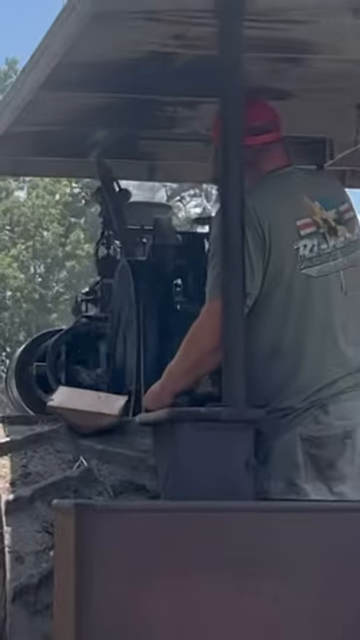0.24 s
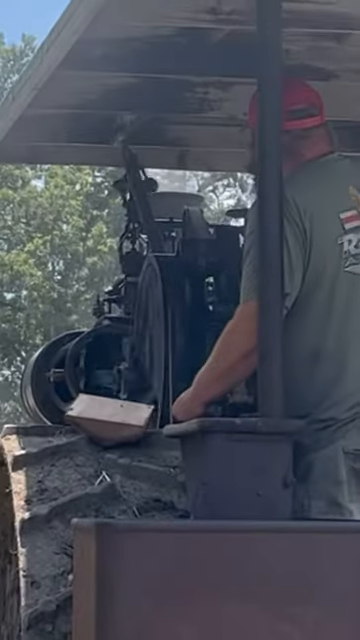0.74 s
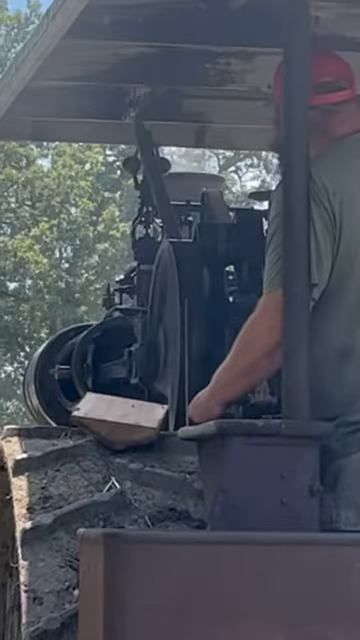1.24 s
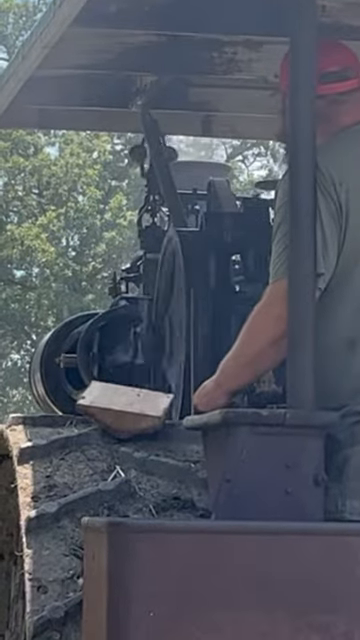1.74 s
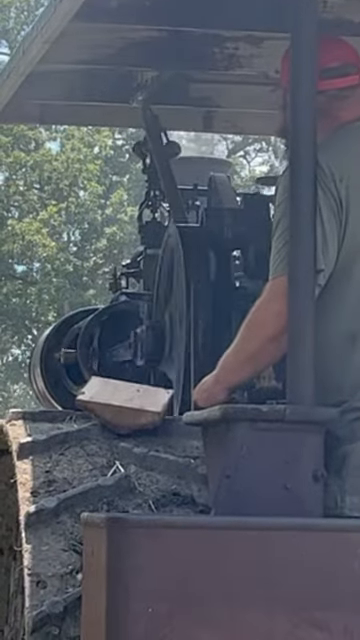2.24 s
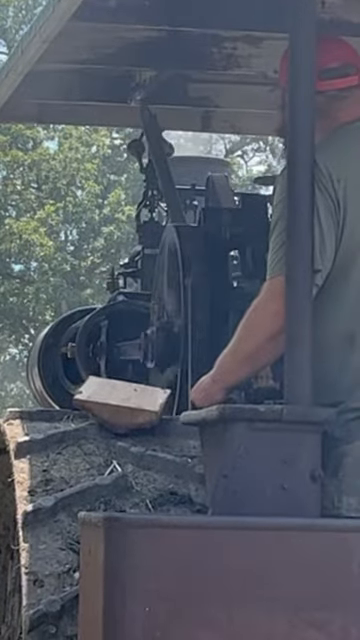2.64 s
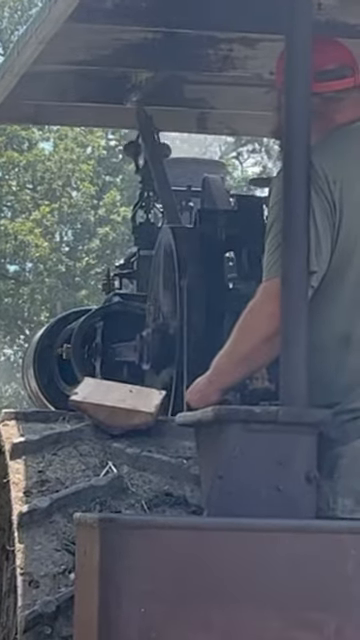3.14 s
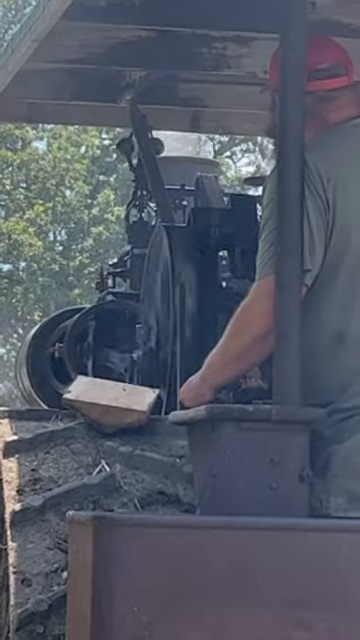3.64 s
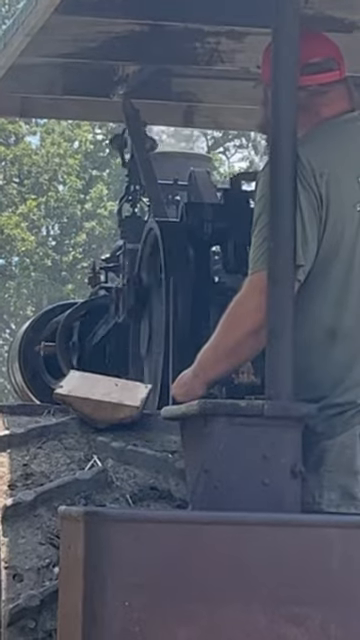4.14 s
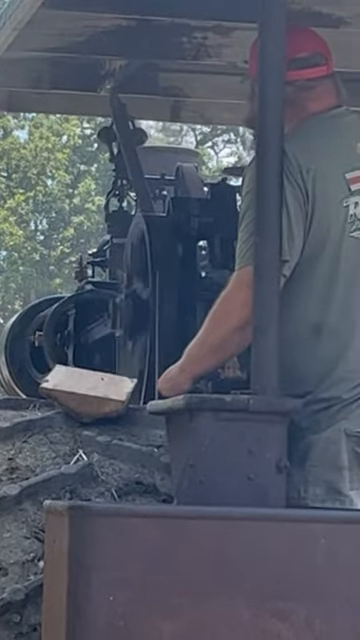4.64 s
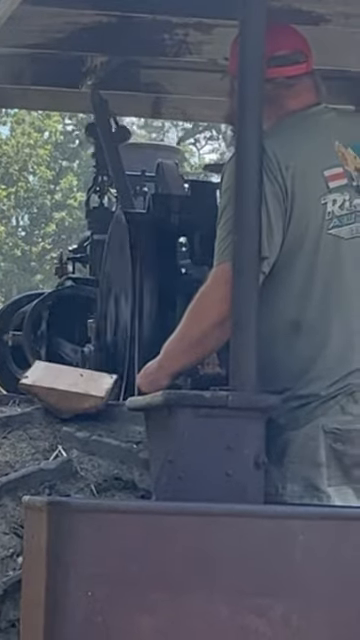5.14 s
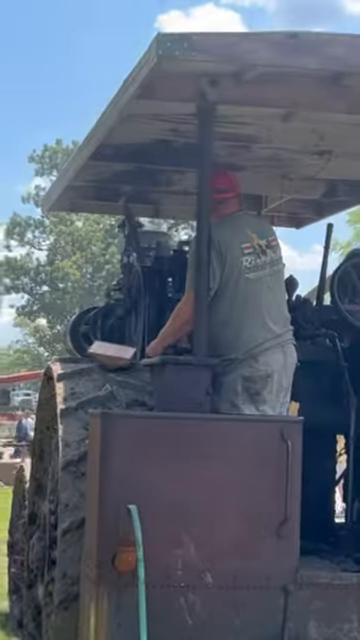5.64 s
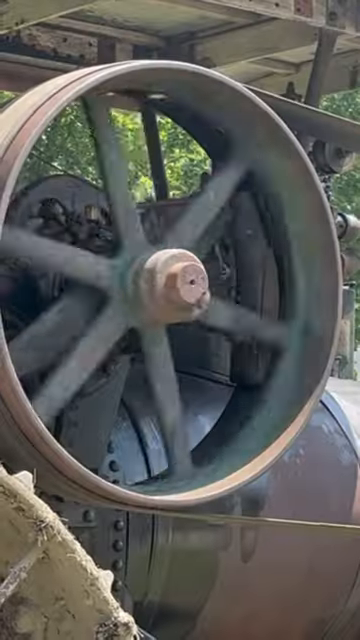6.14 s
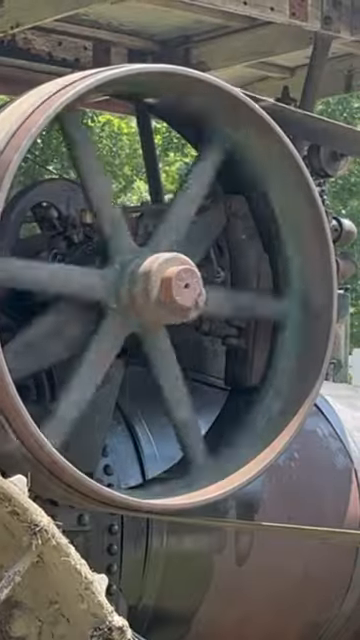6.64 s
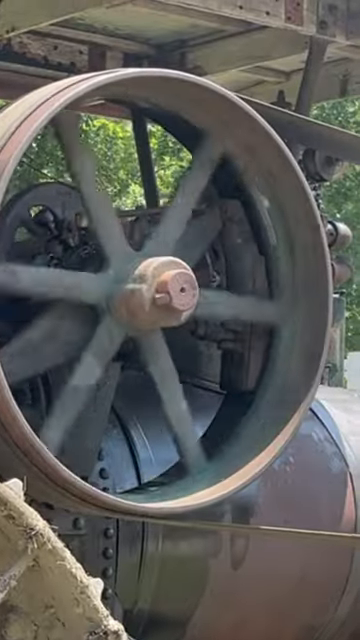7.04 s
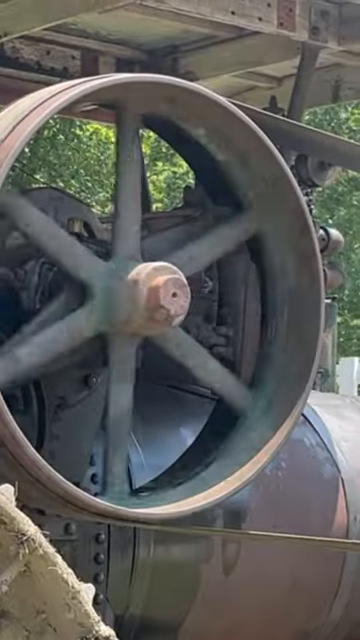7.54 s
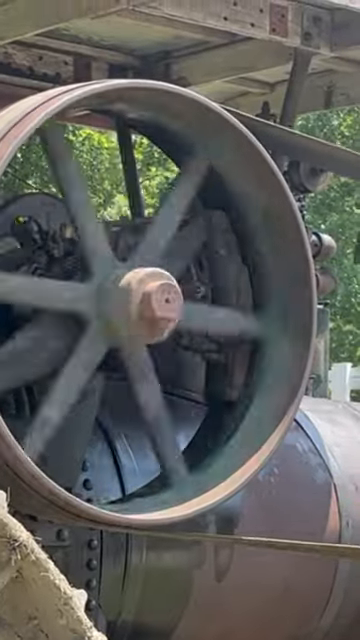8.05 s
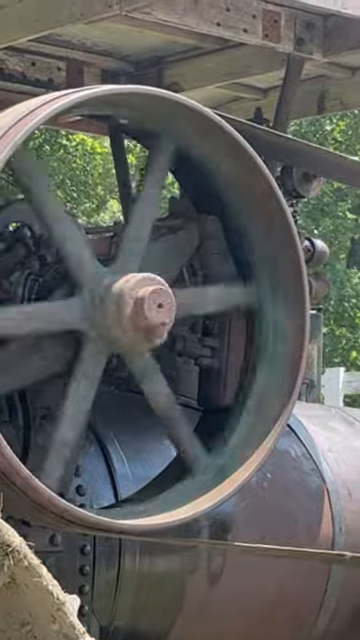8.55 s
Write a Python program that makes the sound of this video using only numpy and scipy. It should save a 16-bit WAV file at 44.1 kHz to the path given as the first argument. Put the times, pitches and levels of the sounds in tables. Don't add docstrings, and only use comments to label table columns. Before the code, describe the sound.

Rapid low steam chuffs, alternately stronger and weaker, thump under rushing sawmill noise and metallic ringing. They swell, then fade into soft puffs with small bright ticks as the saw stops cutting and the hiss drops. A sudden cut brings loud, crisp beats beside the flywheel, with clanking castings, a few cracks and renewed mill rush. Open air, close handheld stereo microphone, quick canopy reflection, faint steady steam hiss.

```python
import sys
import numpy as np
from scipy import signal
from scipy.fft import rfft, irfft
from scipy.io import wavfile

SR = 44100
rng = np.random.default_rng(int(sys.argv[2]) if len(sys.argv) > 2 else 0)


def inscribe(sig):
    pcm = np.round(np.clip(np.atleast_2d(sig).T, -1, 1) * 32767)
    wavfile.write(sys.argv[1], SR, pcm.astype(np.int16))


def elevation(decibels):
    levels = np.asarray(decibels, float)
    return 10 ** (levels / 20)


N = 388080

CHANGE_S = 6.082
ECHO_S, ECHO_BEHIND_DB, ECHO_BESIDE_DB = 0.0447, -26.5, -23.5
FULL_WORK_DB = -36
KNOCK_RISE_S, KNOCK_T60_S = 0.0033, 0.42
FAR_HISS_DB, FAR_HISS_HZ = -55.5, 9000

# start in seconds, pressure of the out stroke in dB,
# pressure of the return stroke in dB, force of the jet in dB.
TURNS_BEHIND = [(0.047, -4, -12.5, -20), (0.284, -6, -10, -22), (0.534, -6, -11, -19.5),
                (0.775, -7.5, -9.5, -19.5), (1.017, -7, -10, -19), (1.258, -8.5, -10, -19.5),
                (1.502, -7, -12.5, -20), (1.752, -7.5, -5.5, -22.5), (2.003, -5, -6, -22),
                (2.255, -5.5, -8.5, -18.5), (2.518, -3, -4.5, -15), (2.773, -4, -6, -14.5),
                (3.019, -2.5, -7, -15), (3.263, -2, -3.5, -14), (3.508, -4, -8.5, -16.5),
                (3.739, -4, -12.5, -18.5), (3.949, -13, -21.5, -24.5), (4.164, -12.5, -22, -26.5),
                (4.379, -17.5, -22.5, -28), (4.588, -15.5, -34, -24.5), (4.808, -18.5, -25, -32),
                (5.015, -22.5, -28, -26), (5.229, -24, -34, -27), (5.441, -23, -47, -27),
                (5.661, -23, -25.5, -29.5), (5.888, -22, -31, -30.5)]
# start in seconds, pressure of the out stroke in dB,
# pressure of the return stroke in dB, force of the jet in dB.
TURNS_BESIDE = [(5.966, -8, -6, -5.5), (6.222, -4, -5.5, -7.5), (6.472, -3, -6.5, -7),
                (6.715, -5.5, -5.5, -8.5), (6.953, -7, -9.5, -10), (7.195, -3.5, -9, -9),
                (7.433, -5, -7, -10.5), (7.673, -6, -7, -11.5), (7.912, -6, -10, -12),
                (8.154, -5.5, -7.5, -12.5), (8.4, -5, -8.5, -10.5), (8.649, -5.5, -9, -10.5)]
RETURN_SHARE = .47, .465
# lag in seconds, level in dB,
# share of the pressure swing as a ratio, return stroke in dB.
THUMP_RULE = [(0.0098, -16, 0.28, .5), (0.0018, -11, 0.14, .6)]
THUMP_ECHO_DB = -12.5, -11
# behind in dB, return stroke behind in dB,
# beside in dB, return stroke beside in dB.
JET_SHARES_DB = [(0.65, -5.5, 0.46, -1.5), (-19, -6.5, -10.5, -2.5), (-24.5, -4, -24, -2.5)]
# lag in seconds, level in dB, rise behind in seconds,
# t60 behind in seconds, rise beside in seconds, t60 beside in seconds.
BLAST_SHAPE = [(-.003, -10.5, 0.0043, 0.15, 0.0042, 0.31), (-.003, -3, 0.0017, 0.29, 0.0053, 0.17),
               (-.002, -2.5, .004, .35, .003, 0.17), (-.002, 3.5, 0.0036, 0.14, 0.0046, 0.14)]
# frequency in Hz, density behind in dB per Hz, density beside in dB per Hz.
BLAST_COLOUR = [(60, 11.5, -73), (136, -35, -34), (266, -1.5, 5), (480, -1.5, -8.5), (865, -6.5, -8),
                (1445, -11.5, -10), (2320, -27, -26), (4760, -20, -25.5), (7600, -39, -35),
                (11700, -46, -44), (14830, -52, -52)]
GROUP_EDGES_HZ = [430, 2300, 6700]
# frequency in Hz, width in Hz, behind in dB, beside in dB.
CHIMNEY_MODES = [(183.4, 24.3, -8, -8.5), (360.8, 42.6, -14, -18), (533, 38, -23, -17),
                 (713.3, 76, -20.5, -8.5), (854, 19, -28.5, -47), (997, 87, -28.5, -19),
                 (2032, 74, -33, -23)]
# start in seconds, peak in
# dB.
SNAPS = [
    (6.084, -25),
    (6.476, -21),
    (7.437, -28),
    (8.405, -45),
]
# time in seconds, level in dB.
WORK = [(0.0, -36.5), (0.7, -37.5), (2.0, -36.5), (2.8, -35.5), (3.44, -35.5), (3.7, -39), (3.88, -43),
        (3.98, -46.5), (4.57, -48), (5.05, -50.5), (5.75, -47.5), (6.07, -48), (6.1, -34.5), (6.3, -34),
        (7.0, -35.5), (7.4, -37.5), (8.0, -38), (8.8, -38.5)]
# start in seconds, low casting in dB, high casting in dB.
KNOCKS = [(0.2, -31.5, -44), (0.399, -39, -27.5), (0.79, -37, -37), (2.26, -27, -48), (2.72, -31, -36),
          (4.0, -37, -48), (4.42, -37, -51), (4.71, -28, -39), (5.09, -35, -33.5), (5.44, -29, -45),
          (5.86, -37, -43), (6.231, -28, -21.5), (6.35, -21, -34), (6.48, -15, -23.5), (6.6, -20, -55),
          (6.76, -34, -33), (6.85, -26, -32), (6.95, -19, -22), (7.45, -25, -36), (8.03, -41, -60),
          (8.19, -27, -42), (8.27, -40, -49), (8.66, -23, -40)]
# behind in dB, beside in dB,
# share of the work's swing as a ratio.
SHAKING_DB = [(-38.5, -32.5, .05), (-39, -34.5, .1)]
# casting as 0 low or 1 high, frequency in Hz, width in Hz,
# behind in dB, beside in dB.
CASTING_MODES = [(0, 925, 70, -5, -9), (0, 860, 45, -9, -11), (1, 1520, 48, -4, -4),
                 (1, 3360, 150, -24, -20), (1, 9150, 150, -29, -36), (0, 13000, 300, -36, -42)]
# start in seconds, peak in dB.
TICKS = [(4.187, -32), (4.4055, -36), (4.5883, -32), (4.624, -28.5), (4.8357, -28.5), (5.0502, -29),
         (5.266, -33), (5.4792, -32), (5.6935, -28), (5.911, -29), (5.9716, -34)]
# frequency in Hz, t60 in seconds, level in dB.
TICK_MODES = [(3840, 0.007, -4.5), (4540, 0.0074, -3), (5350, 0.0036, 0.5), (5960, 0.0092, -2),
              (6800, 0.0075, -23.5), (8550, 0.0049, -24)]
# behind at full work in dB, beside at full work in dB,
# share of the work's swing as a ratio.
RUNNING_DB = [(-25, -25, 0.19), (-32, -32, 0.61), (-35.5, -36.5, .98), (-45.5, -45.5, 1)]
# frequency in Hz, density behind in dB per Hz,
# density beside in dB per Hz.
RUNNING_COLOUR = [(29.7, -8.5, -4), (58, 10, -3.5), (130, -2.5, -7), (330, -6, -15), (590, -14.5, -9),
                  (990, -14, -8.5), (2370, -21.5, -16.5), (5000, -28.5, -18), (7300, -38.5, -28.5),
                  (11700, -51.5, -38), (15500, -55, -42)]
# frequency in Hz, lead of the left in radians.
PORT_PHASE = [(30, -.03), (200, -.15), (780, -.55), (1460, -.8), (2600, -.1), (5000, .05), (5550, -3.14),
              (6550, -3.14), (6850, -6.2), (7490, -6.2), (9150, -3.9), (9500, -3.14), (10250, -3.14),
              (10500, -2.4), (11800, -.2), (13000, -.02), (14000, 2.9), (15200, 3.14)]
# frequency in Hz, left minus right in dB.
PORT_BALANCE = [(30, 1), (150, 3), (350, 3.5), (700, -0.2), (1400, -1), (2800, 1), (5000, 0.5)]
# frequency in Hz, level in dB.
SCATTER = [(30, -38), (150, -30), (400, -20), (800, -14), (1100, -7), (1500, -4), (2300, -5), (3000, -23),
           (4800, -21), (5600, -36), (6500, -36), (8000, -10), (9500, -34), (10300, -34), (12000, -11),
           (15000, -24)]


def rms_one(x):
    return x / np.sqrt(np.mean(x ** 2) + 1e-20)


def by_place(behind_db, beside_db):
    return np.where(np.arange(N) < CHANGE_S * SR, elevation(behind_db), elevation(beside_db))


def at_hz(table, hz, order=1):
    table = np.array(table, float)
    return np.interp(np.log(hz + 1), np.log(table[:, 0] + 1), table[:, order])


def clicks(times_s, gains):
    at = np.round(np.asarray(times_s) * SR).astype(int)
    return np.bincount(np.maximum(at, 0), gains * np.ones(len(at)), minlength=N) + 1e-18


def resonate(x, hz, width_hz):
    r = np.exp(-np.pi * width_hz / SR)
    zeros = np.array([1, 0, -1]) * (1 - r * r) / 2
    poles = [1, -2 * r * np.cos(2 * np.pi * hz / SR), r * r]
    return signal.lfilter(zeros, poles, x)


def swell(x, rise_s, t60_s):
    rise = np.exp(-1 / (max(rise_s, 1e-4) * SR))
    fall = elevation(-60 / (t60_s * SR))
    return signal.lfilter([(1 - rise) ** 2], np.convolve([1, -2 * rise, rise * rise], [1, -fall]), x)


def drift(rate_hz):
    r = np.exp(-16 * np.pi * rate_hz / SR)
    white = rng.standard_normal(N // 8 + 5002)
    slow = signal.lfilter([1], [1, -2 * r, r * r], white)[5000:]
    return np.interp(np.arange(N) / 8, np.arange(len(slow)), rms_one(slow))


def bands(colour):
    edges_hz = np.geomspace(24, 16500, 25)
    hz = np.sqrt(edges_hz[1:] * edges_hz[:-1])
    group = np.searchsorted(GROUP_EDGES_HZ, hz)
    levels_db = []
    for place in (1, 2):
        db = at_hz(colour, hz, order=place) + 10 * np.log10(hz)
        levels_db.append(db - 10 * np.log10(np.bincount(group, elevation(db) ** 2))[group])
    white = rng.standard_normal((2, N))
    for k in range(len(hz)):
        sos = signal.butter(2, edges_hz[k:k + 2], "band", fs=SR, output="sos")
        noise = signal.sosfilt(sos, white[k % 2])
        yield group[k], rms_one(noise) * by_place(levels_db[0][k], levels_db[1][k])


def with_echo(x, levels_db=(ECHO_BEHIND_DB, ECHO_BESIDE_DB)):
    lag = round(ECHO_S * SR)
    return x + by_place(*levels_db) * np.concatenate([np.zeros(lag), x[:-lag]])


def beats():
    rows = []
    for place, (turns, share) in enumerate(zip((TURNS_BEHIND, TURNS_BESIDE), RETURN_SHARE)):
        s, out_db, back_db, jet_db = np.transpose(turns)
        turn_s = np.append(np.diff(s), s[-1] - s[-2])
        one = np.ones(len(s))
        rows.append([s, out_db, jet_db, 0 * one, place * one])
        rows.append([s + share * turn_s, back_db, jet_db, one, place * one])
    rows = np.concatenate(rows, axis=1)
    return rows[:, (rows[0] > CHANGE_S - .01) == (rows[4] == 1)]


def work_db():
    s, db = np.transpose(WORK)
    return np.interp(np.arange(N) / SR, s, db) - FULL_WORK_DB


def thumps(hz=68, width_hz=45, front_db=-6, deep_db=-9):
    s, pressure_db, _, back, place = beats()
    lag_s, base_db, share, back_db = np.array(THUMP_RULE)[place.astype(int)].T
    s = s + lag_s
    db = base_db + share * pressure_db + back_db * back
    impulses = clicks(np.append(0, s + .5), np.append(1, -elevation(db)))
    kick = signal.lfilter([.03], [1, -.97], impulses)
    kick = np.append(kick, np.zeros(SR))[:N + SR // 2]
    front = resonate(kick, hz, 2 * width_hz)
    rocking = resonate(resonate(kick, hz, width_hz), hz, width_hz)
    deep = resonate(front, 46.3, 15)
    rocking, front, deep = [part / np.abs(part[:SR // 4]).max() for part in (rocking, front, deep)]
    thump = rocking + elevation(front_db) * front + elevation(deep_db) * deep
    return with_echo(thump[SR // 2:], THUMP_ECHO_DB)


def blasts():
    s, pressure_db, jet_db, back, place = beats()
    levels_db = [pressure_db]
    for behind_db, back_behind_db, beside_db, back_beside_db in JET_SHARES_DB:
        share_db = np.where(place, beside_db + back_beside_db * back, behind_db + back_behind_db * back)
        levels_db.append(jet_db + share_db)
    behind = np.arange(N) < CHANGE_S * SR
    flows = []
    for db, (lag_s, share_db, *times_s) in zip(levels_db, BLAST_SHAPE):
        onset = clicks(s + lag_s, elevation(db + share_db))
        flow = np.where(behind, swell(onset, *times_s[:2]), swell(onset, *times_s[2:]))
        flows.append(with_echo(flow))
    tearing = elevation(1.2 * drift(40) + 1.3 * drift(310))
    out = tearing * sum(flows[group] * noise for group, noise in bands(BLAST_COLOUR))

    valve = clicks(s - .004, elevation(pressure_db))
    flow = np.where(behind, swell(valve, 0.00067, 0.38), swell(valve, 0.002, 0.23))
    jet = with_echo(flow) * tearing * rng.standard_normal(N)
    jet = jet - with_echo(swell(elevation(-6) * valve, 0.00031, 0.0051))
    for k, (hz, width_hz, behind_db, beside_db) in enumerate(CHIMNEY_MODES):
        evened = np.sqrt(SR / (np.pi * width_hz))
        ring = resonate(resonate(jet, hz, 4 * width_hz), hz, width_hz)
        out += (-1) ** k * evened * by_place(behind_db, beside_db) * ring
    return out


def snaps(t60_s=.02):
    s, db = np.transpose(SNAPS)
    return swell(clicks(s, elevation(db)), .0002, t60_s) * rng.standard_normal(N)


def castings(patchy_db=2.0):
    s, *knocks_db = np.transpose(KNOCKS)
    work = work_db()
    unit = swell(clicks([0], 1)[:SR // 4], KNOCK_RISE_S, KNOCK_T60_S).max()
    shaking = []
    for db, (behind_db, beside_db, share) in zip(knocks_db, SHAKING_DB):
        steady = by_place(behind_db, beside_db) * elevation(share * work + 1.3 * drift(12))
        shaking.append(steady + swell(clicks(s, elevation(db)), KNOCK_RISE_S, KNOCK_T60_S) / unit)
    out = 0
    for casting, hz, width_hz, behind_db, beside_db in CASTING_MODES:
        shocks = rng.standard_normal(N) * elevation(patchy_db * drift(34))
        ring = rms_one(resonate(resonate(shocks, hz, width_hz), hz, 3 * width_hz))
        out = out + shaking[round(casting)] * by_place(behind_db, beside_db) * ring
    return out


def ticks():
    s, db = np.transpose(TICKS)
    chance_db = rng.normal(0, 1.1, (len(s), len(TICK_MODES)))
    rattle = rng.standard_normal(N)
    out = 0
    for k, (hz, t60_s, mode_db) in enumerate(TICK_MODES):
        width_hz = np.log(1000) / (np.pi * t60_s)
        knock = swell(clicks(s, elevation(db + 14.0 + mode_db + chance_db[:, k])), 0.00012, 0.025)
        out = out + resonate(resonate(knock * rattle, hz, 3 * width_hz), hz, width_hz)
    return out


def running():
    shared_db, work = 1.0 * drift(20.5), work_db()
    gains = [by_place(behind_db, beside_db) * elevation(share * work + shared_db)
             for behind_db, beside_db, share in RUNNING_DB]
    return sum(noise * gains[group] * elevation(0.94 * drift(19.0)) for group, noise in bands(RUNNING_COLOUR))


def far_hiss():
    sos = signal.butter(2, FAR_HISS_HZ, "high", fs=SR, output="sos")
    return elevation(FAR_HISS_DB) * signal.sosfilt(sos, rng.standard_normal(N))


def scene():
    sound = thumps() + blasts() + snaps() + castings() + ticks() + running() + far_hiss()
    return np.array([sound, sound])


def low_pass(x):
    return signal.sosfilt(signal.butter(12, 15650, fs=SR, output="sos"), x)


def record(dry):
    hz = np.arange(N // 2 + 1) * SR / N
    direct = rfft(dry[0])
    half_phase = .5 * at_hz(PORT_PHASE, hz)
    tilt = elevation(.5 * at_hz(PORT_BALANCE, hz))
    tail = rng.standard_normal(6000) * np.exp(-np.arange(6000) / 1200)
    tail = tail / np.linalg.norm(tail)
    scattered = direct * rfft(tail, N) * elevation(at_hz(SCATTER, hz))
    left = (direct + scattered) * tilt * np.exp(1j * half_phase)
    right = (direct - scattered) / tilt * np.exp(-1j * half_phase)
    x = irfft(np.array([left, right]), N)
    mix = 1.039 * np.tanh(x / 0.99)
    return low_pass(mix)


dry = scene()
out = record(dry)
inscribe(out)
```